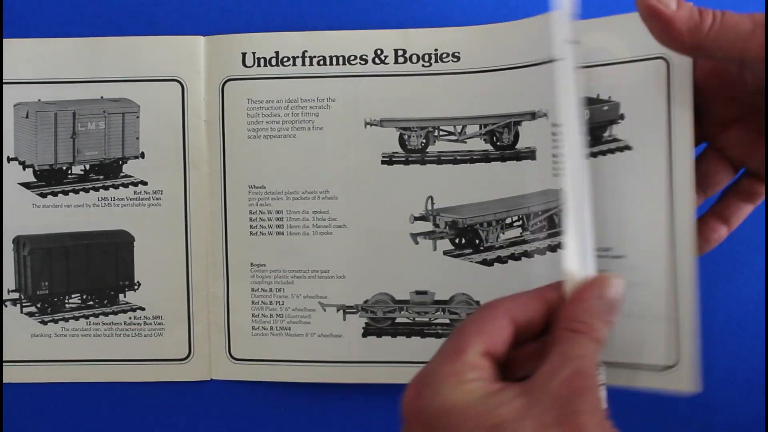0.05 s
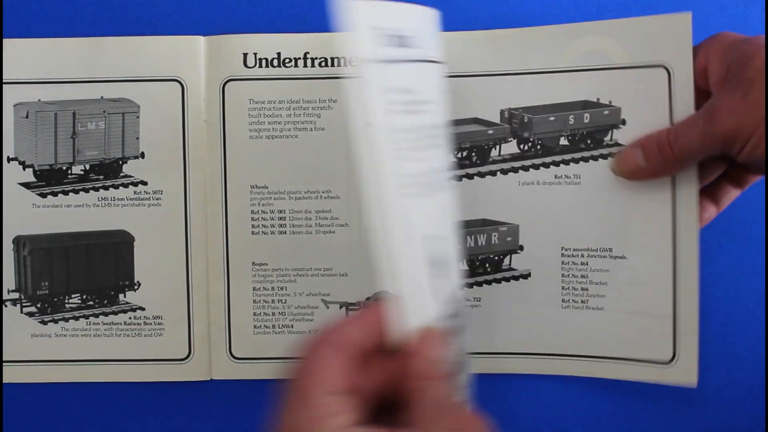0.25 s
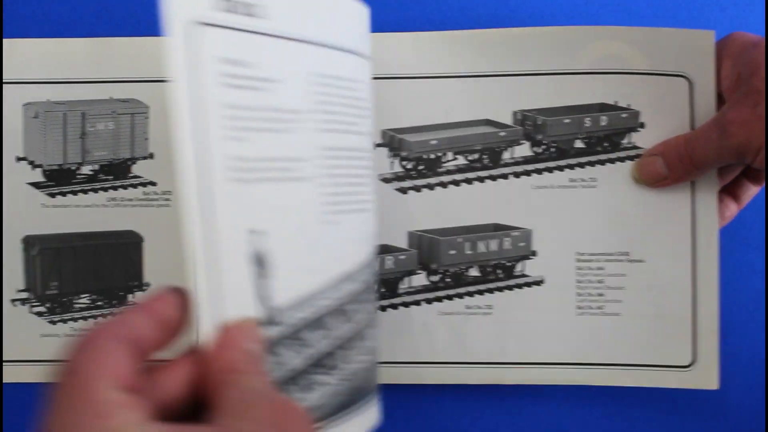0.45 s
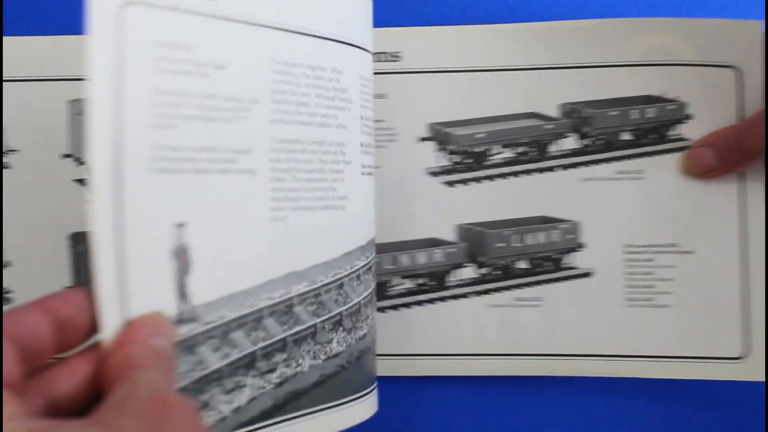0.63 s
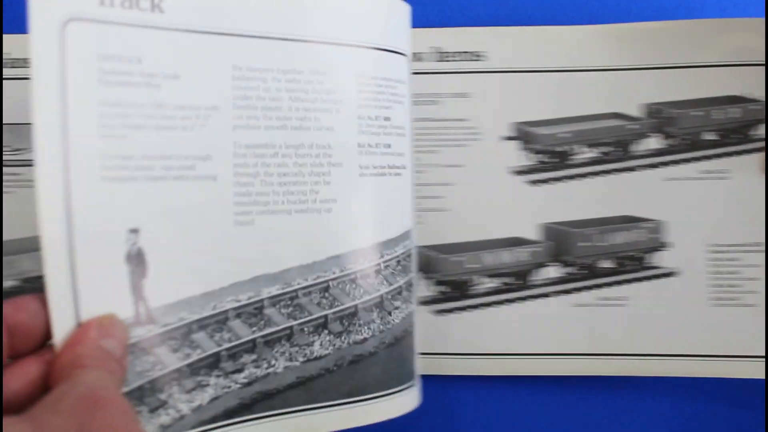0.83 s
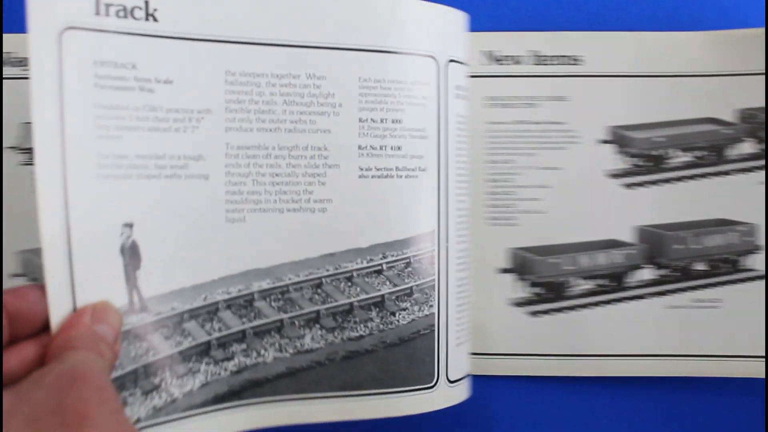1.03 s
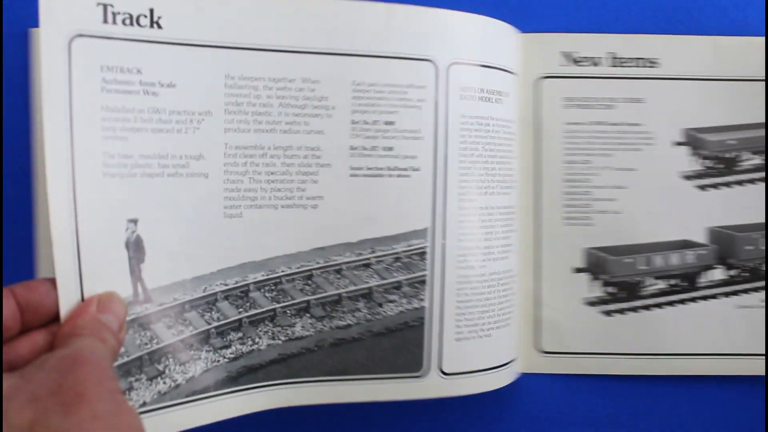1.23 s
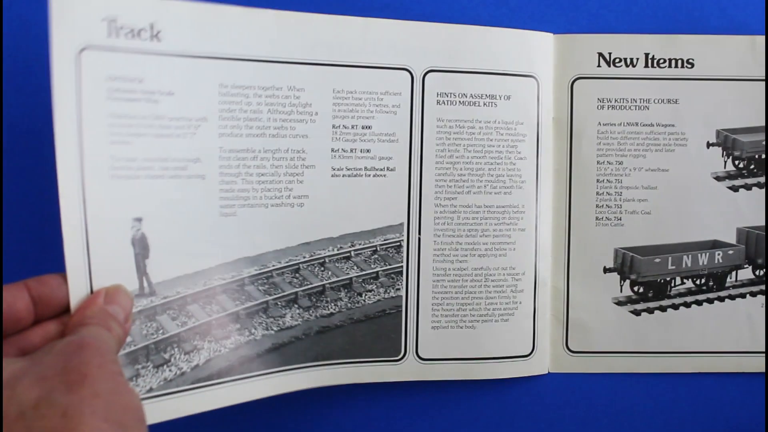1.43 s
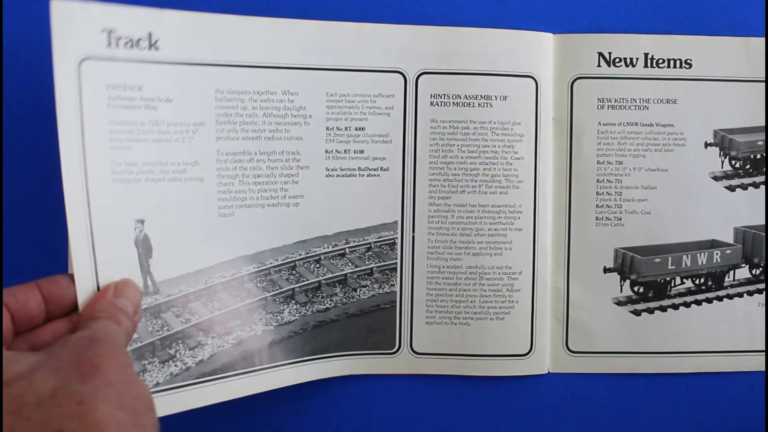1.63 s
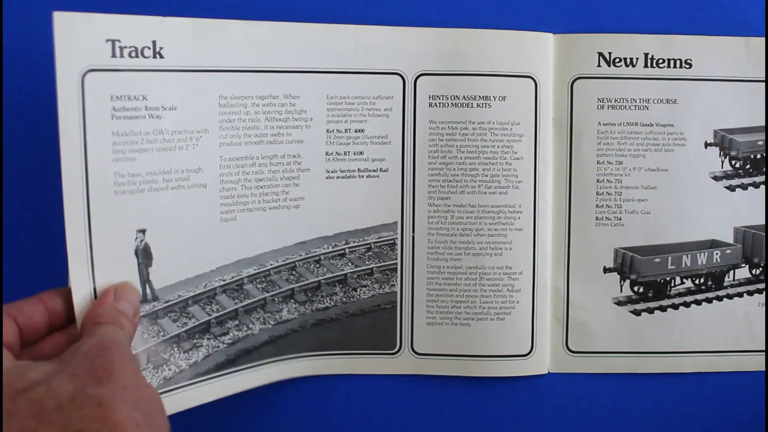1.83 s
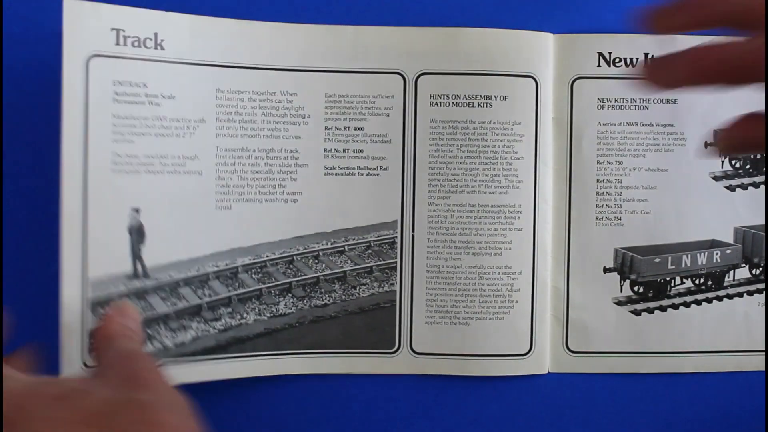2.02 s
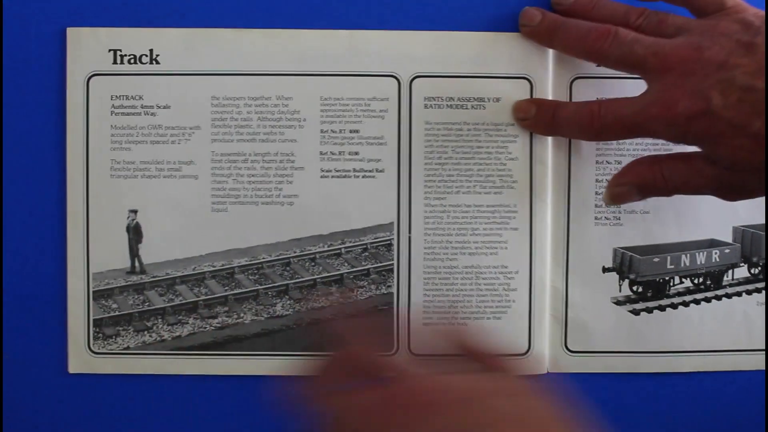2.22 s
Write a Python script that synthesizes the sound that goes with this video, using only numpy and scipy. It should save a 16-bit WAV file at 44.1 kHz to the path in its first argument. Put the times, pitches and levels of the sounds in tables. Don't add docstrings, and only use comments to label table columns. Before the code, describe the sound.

Close dry page turn of stiff paper: small crackles, a swishing slide, and two loud pops.

```python
import sys
import numpy as np
from scipy import signal
from scipy.fft import rfft, irfft, next_fast_len
from scipy.io import wavfile
from scipy.ndimage import uniform_filter1d, map_coordinates

SR = 44100
rng = np.random.default_rng(int(sys.argv[2]) if len(sys.argv) > 2 else 0)


def waveform_to_disk(signal):
    frames = np.transpose(np.atleast_2d(signal))
    scaled = np.clip(frames, -1, 1) * 32767
    samples = np.round(scaled).astype(np.int16)
    wavfile.write(sys.argv[1], SR, samples)


def invert_db(x):
    u = np.asarray(x, float) / 20
    return 10 ** u


N = 100062

# f/Hz, density/dB
ROOM_SPECTRUM = [(20, -14), (40, -10), (65, -6.5), (300, -6), (800, -11.5), (1600, -20.5), (4000, -27),
                 (16000, -37)]
# f/Hz, width/Hz, level/dB
ROOM_HUMS = [(57.4, 4.7, -66.5), (105, 28, -67.5), (147, 17.6, -60), (226.4, 20, -62), (4700, 740, -68.5)]
ROOM_DB, ROOM_SWELL_DB = -52.5, .4

# t/s, level/dB
BEND_LEVEL = [(0, -45.5), (.15, -49), (.25, -52), (.45, -54.5), (.62, -53), (.75, -54), (1.0, -52.5),
              (1.45, -54.5), (1.75, -64), (2.27, -66)]
# f/Hz, width/Hz, level/dB
BEND_MODES = [(870, 840, -2), (1640, 870, 2)]
# t/s, level/dB
BELLY_LEVEL = [(0, -50), (.3, -52), (.6, -47.5), (.68, -67), (1.15, -64), (1.45, -56.5), (1.7, -75),
               (2.05, -65), (2.27, -59.5)]
BELLY_HZ, BELLY_WIDTH_HZ = 359, 111
BEND_GRAINS_PER_S, BEND_SCATTER_DB, BEND_FLICKER_DB = 1500, 1.8, 1.2

# t centre/s, level/dB, half length/s, f/Hz
BRUSHES = [(0.026, -47, 0.018, 4100), (0.22, -49.5, 0.055, 4050), (0.343, -55.5, 0.014, 3100),
           (0.553, -58, 0.1, 7100), (1.679, -56, 0.014, 7000), (1.997, -65, 0.03, 4300),
           (2.238, -53, 0.032, 2330), (0.947, -44, 0.038, 5900), (.926, -46, 0.0057, 6500),
           (1.6, -54.5, 0.027, 1200), (1.844, -47.5, 0.0062, 1100), (1.681, -47.5, 0.0066, 2400)]

# t/s, level/dB
SLIDE_LEVEL = [(0, -53.5), (.45, -60.5), (.55, -57.5), (.7, -53), (.85, -48.5), (.865, -42), (.91, -43),
               (.93, -37.5), (.96, -40), (.99, -39.5), (1.1, -40.5), (1.3, -42), (1.39, -46), (1.425, -57),
               (1.445, -60.5), (1.6, -67), (2.0, -65), (2.27, -68)]
# f/Hz, density/dB
SLIDE_SPECTRUM = [(200, -50), (900, -16.5), (2000, -11), (3300, -4), (5500, -8), (10400, -11), (14600, -19),
                  (16000, -35)]
# f/Hz, width/Hz, level/dB
GAP_MODES = [(3342, 780, -10.5), (4560, 1260, -7.5), (6800, 1600, -14)]
# delay/s, level/dB
PAGE_ECHOES = [(.00032, -26), (.00118, -17)]
SLIDE_GRAINS_PER_S, SLIDE_SCATTER_DB, SLIDE_FLICKER_DB = 14000, 1.5, .6
GAP_RISE_PER_S, GAP_WANDER_DB = .55, 1.5
FLATTEN_PER_S, FLATTEN_MID_S = 0.617, 1.177

# t/s, level/dB, f/Hz, t60/s, bright share/dB
FLUTTERS = [(.028, -50, 1640, 0.13, 9.5), (.142, -39.5, 1100, 0.07, -15), (0.295, -45.5, 955, 0.59, -26),
            (0.336, -48, 1460, .4, -14), (0.433, -36.5, 510, 0.11, -3.5), (.529, -34.5, 490, .2, -11),
            (.546, -39, 520, 0.29, -19), (.858, -32, 734, 0.34, -10), (1.400, -34, 680, 0.16, -6.5),
            (1.409, -37.5, 925, 0.16, -10), (1.49, -45.5, 675, 0.22, -26), (1.508, -38, 734, 0.069, -26),
            (1.604, -32, 1050, 0.25, -37), (1.618, -28, 575, 0.2, -6), (1.652, -42.5, 540, 0.14, 1),
            (1.676, -52, 600, 0.22, 4.5), (1.85, -31.5, 1065, 0.19, -9), (1.918, -43, 1130, 0.25, -7),
            (2.043, -43.5, 1340, 0.12, -19), (2.203, -48.5, 990, 0.11, 4.5)]
FLUTTER_GRAINS_PER_S, FLUTTER_SCATTER_DB, FLUTTER_ATTACK_S = 3700, 0, .002
FLUTTER_Q, BRIGHT_HZ = 1.5, 1850

# t/s, peak level/dB, f/Hz, width/cycles, crack relative level/dB
SNAPS = [(.036, -36.5, 3940, 6.7, 1), (0.299, -26, 1800, .4, -11), (.4355, -25.5, 1550, 1.7, -14.5),
         (.530, -25.5, 1420, 2.7, -8.5), (0.5317, -25, 494, 1.24, -30), (0.8629, -20, 2100, 3.6, -11),
         (.860, -30, 465, 2.4, -30), (.864, -35.5, 885, 4.6, -30), (1.354, -35, 950, 3.6, -16),
         (1.4104, -24.5, 840, 1.4, -31), (1.4193, -29, 3180, 0.78, -23), (1.514, -31.5, 744, 1.2, -29),
         (1.6153, -6.5, 985, 0.59, -18.5), (1.6170, -9, 780, 0.78, -24), (1.6216, -21, 1200, 2, -19),
         (1.6257, -25.5, 610, 3.6, -27), (1.849, -8, 1130, 0.94, -20.5), (1.854, -22, 970, 0.66, -44),
         (1.858, -24, 990, 0.87, -30), (1.9214, -22, 1220, 1, -13), (2.047, -34, 1460, 3.2, -13.5),
         (2.2026, -22, 2260, 1.3, -16)]
RING_ON = 1.26
CRACK_S, CRACK_HZ = 0.00068, 2920
THUMP_HZ, THUMP_DB, THUMP_S = 138, -29, .01
SHEET_EDGE_HZ = 232

MIC_NOTCH_HZ, MIC_NOTCH_WIDTH_HZ, MIC_NOTCH_DB = 11300, 250, -4
TOP_HZ = 15550


def unit(x):
    return x / np.sqrt(np.mean(x ** 2))


def noise(count=N):
    return rng.standard_normal(count)


def band(x, hz, width_hz):
    return signal.lfilter(*signal.iirpeak(hz, hz / width_hz, fs=SR), x)


def mode(x, hz, width_1_hz, width_2_hz):
    return unit(band(band(x, hz, width_1_hz), hz, width_2_hz))


def colour(x, spectrum):
    f = np.maximum(np.arange(len(x) // 2 + 1) * SR / len(x), 1)
    hz, db = np.array(spectrum).T
    gain = invert_db(np.interp(np.log(f), np.log(hz), db))
    return unit(irfft(rfft(x) * gain, len(x)))


def curve(table):
    s, db = np.array(table).T
    return invert_db(np.interp(np.arange(N) / SR, s, db))


def walk(rate_hz):
    k = int(SR / rate_hz)
    return unit(uniform_filter1d(uniform_filter1d(noise(), k), k))


def grains(rate_per_s, scatter_db, count=N):
    hit, sign, size = rng.random((3, count))
    click = np.sign(sign - .5) * invert_db(-scatter_db * np.log(size + 1 / 300))
    return (hit < rate_per_s / SR) * click + 1e-18


def add(out, x, s):
    i = int(round(s * SR))
    out[i:i + len(x)] += x[:len(out) - i]


def room():
    hums = sum(invert_db(db) * mode(noise(), hz, w, w) for hz, w, db in ROOM_HUMS)
    return colour(noise(), ROOM_SPECTRUM) * invert_db(ROOM_DB + ROOM_SWELL_DB * walk(2)) + hums


def creak(hz, width_hz):
    clicks = grains(BEND_GRAINS_PER_S, BEND_SCATTER_DB)
    return invert_db(BEND_FLICKER_DB * walk(20)) * mode(clicks, hz, width_hz, 2 * width_hz)


def bend():
    sheet = unit(sum(invert_db(db) * creak(hz, w) for hz, w, db in BEND_MODES))
    return sheet * curve(BEND_LEVEL) + creak(BELLY_HZ, BELLY_WIDTH_HZ) * curve(BELLY_LEVEL)


def brushes():
    out, t = np.zeros(N), np.arange(N) / SR
    for s, db, half_s, hz in BRUSHES:
        swell = np.exp(-((t - s) / half_s) ** 2)
        out += invert_db(db) * swell * mode(grains(9000, 1.8), hz, 1.02 * hz, 2.0 * hz)
    return out


def slide():
    i = np.arange(N)
    late = np.clip(i / SR - FLATTEN_MID_S, -.4, .4)
    x = colour(grains(SLIDE_GRAINS_PER_S, SLIDE_SCATTER_DB), SLIDE_SPECTRUM)
    x = x * invert_db(SLIDE_FLICKER_DB * walk(130))
    for hz, w, db in GAP_MODES:
        climb = np.exp(2j * np.pi * np.cumsum(hz * GAP_RISE_PER_S * late) / SR)
        analytic = signal.hilbert(band(band(noise(), hz, w), hz, w), next_fast_len(N))[:N]
        gap = unit(np.real(analytic * climb))
        x = x + invert_db(db + GAP_WANDER_DB * walk(17)) * gap
    echoes = np.zeros(N)
    for delay_s, db in PAGE_ECHOES:
        lag = delay_s * SR * np.exp(-FLATTEN_PER_S * late)
        echoes += invert_db(db) * map_coordinates(x, [i - lag], mode="mirror")
    return unit(x + echoes) * curve(SLIDE_LEVEL)


def flutters():
    out, t = np.zeros(N), np.arange(13000) / SR
    for s, db, hz, t60_s, bright_db in FLUTTERS:
        clicks = grains(FLUTTER_GRAINS_PER_S, FLUTTER_SCATTER_DB, len(t))
        ring = mode(clicks, hz, hz / FLUTTER_Q, hz / FLUTTER_Q)
        crinkle = mode(noise(len(t)), BRIGHT_HZ, 2000, 3300)
        shape = (1 - np.exp(-t / FLUTTER_ATTACK_S)) * np.exp(-np.log(1000) * t / t60_s)
        add(out, invert_db(db) * shape * (ring + invert_db(bright_db) * crinkle), s)
    return out


def snaps():
    out, t = np.zeros(N), np.arange(-660, 2200) / SR
    late = np.maximum(t, 0)
    thump = np.sin(2 * np.pi * THUMP_HZ * late) * np.exp(-late / THUMP_S)
    edge = signal.butter(2, SHEET_EDGE_HZ, "high", fs=SR, output="sos")
    for s, db, hz, cycles, crack_db in SNAPS:
        half_cycles = .5 * cycles * np.where(t > 0, RING_ON, 1)
        pull = -np.cos(2 * np.pi * hz * t) * np.exp(-(t * hz / half_cycles) ** 2)
        crack = mode(noise(len(t)), CRACK_HZ, 4000, 12000) * np.exp(-np.abs(t) / CRACK_S)
        snap = signal.sosfiltfilt(edge, pull) + invert_db(crack_db) * crack + invert_db(THUMP_DB) * thump
        add(out, invert_db(db) * snap, s + t[0])
    return out


def scene():
    return (room() + bend() + brushes() + slide() + flutters() + snaps())[None]


def top_cut(x):
    return signal.sosfilt(signal.butter(12, 16460, fs=SR, output="sos"), x)


def record(dry):
    mic = dry - invert_db(MIC_NOTCH_DB) * band(dry, MIC_NOTCH_HZ, MIC_NOTCH_WIDTH_HZ)
    low_pass = signal.ellip(8, .2, 60, TOP_HZ, fs=SR, output="sos")
    return top_cut(signal.sosfilt(low_pass, mic))


dry = scene()
out = record(dry)
waveform_to_disk(out)
```